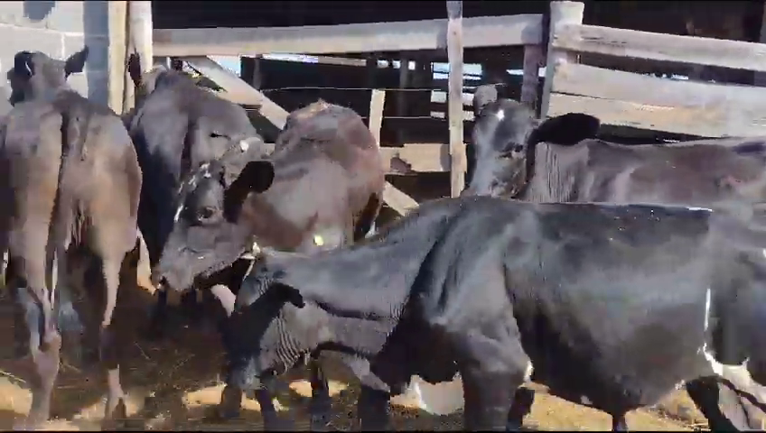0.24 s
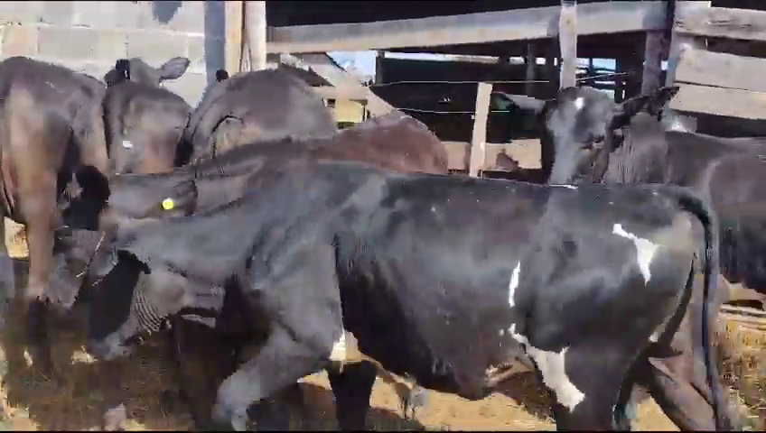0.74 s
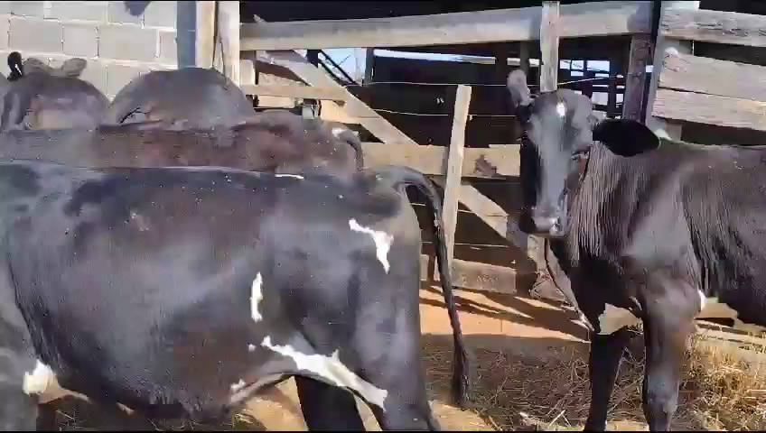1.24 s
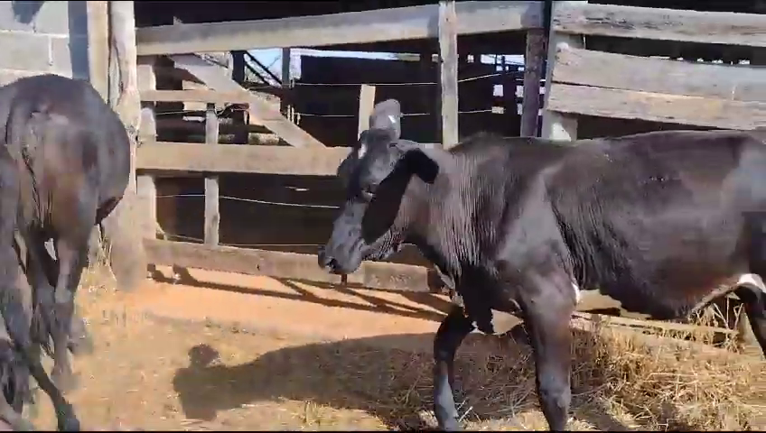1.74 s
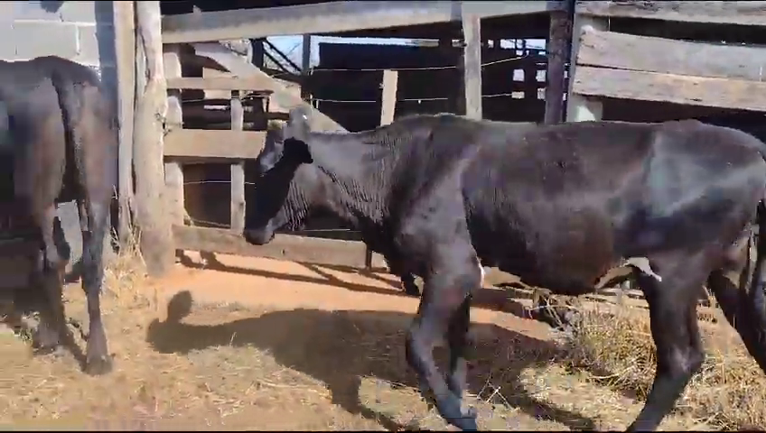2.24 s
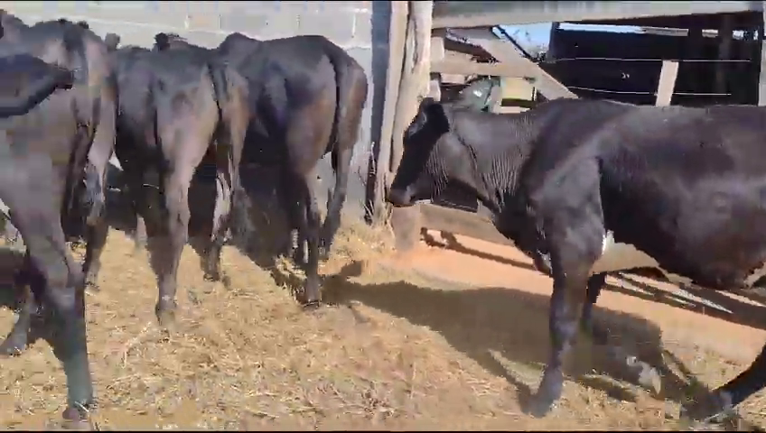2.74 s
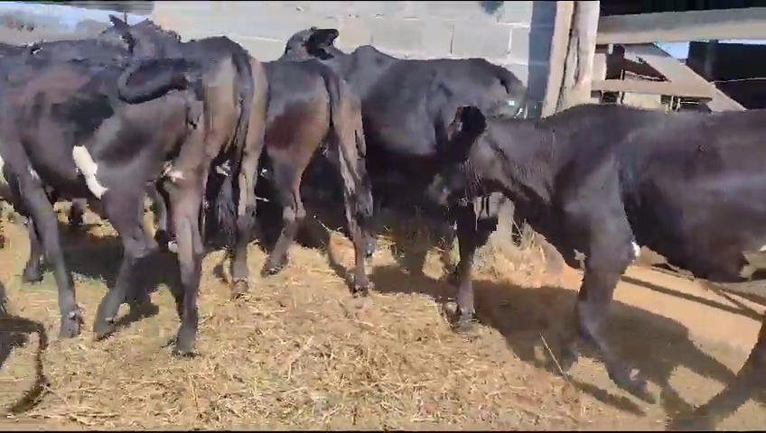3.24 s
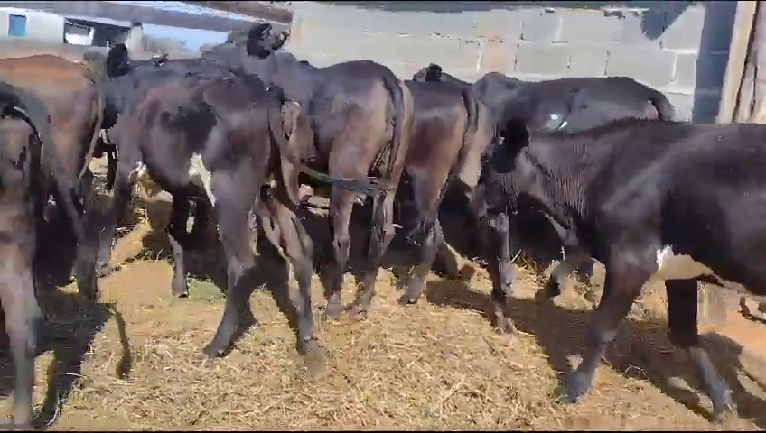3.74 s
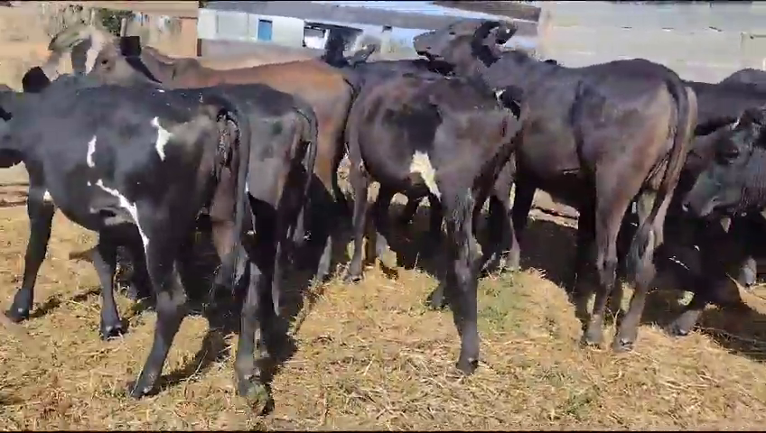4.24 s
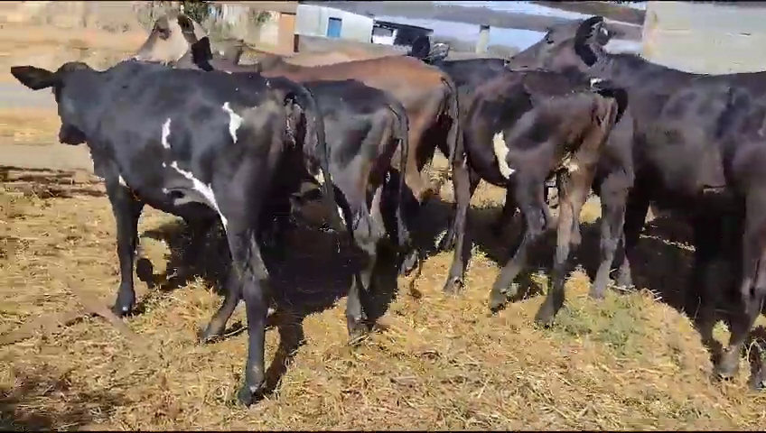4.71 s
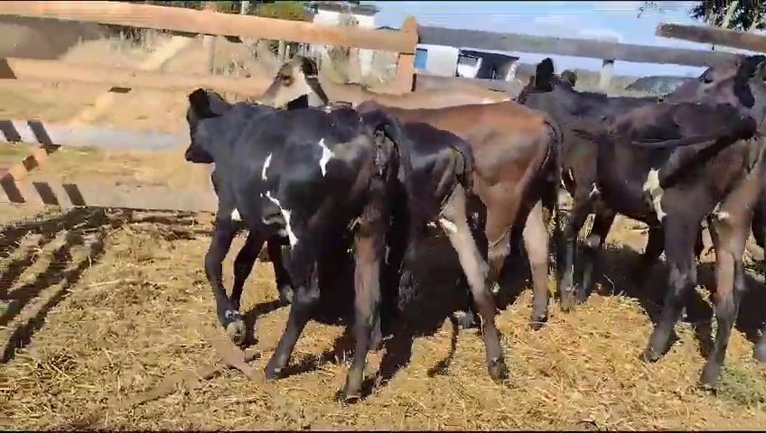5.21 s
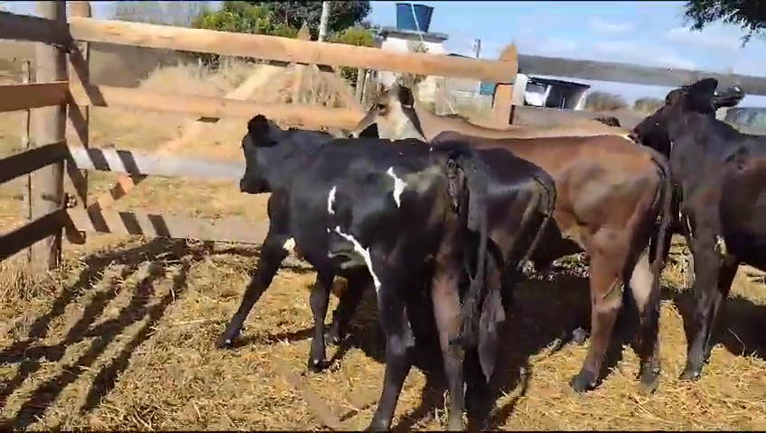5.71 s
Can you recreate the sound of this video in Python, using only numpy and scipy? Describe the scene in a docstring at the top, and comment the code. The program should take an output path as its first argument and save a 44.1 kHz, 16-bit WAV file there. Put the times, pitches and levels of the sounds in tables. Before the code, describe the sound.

Young cattle shuffle through dry straw in an open pen, with dull hoof clops, stalk snaps, gusty wind rumble and late plank knocks.

```python
"""Straw rustles and snaps first, under young cattle shuffling about in a straw-covered pen; hooves clop on packed earth.
Later one hoof scuffs hard and planks are knocked twice, with a short diffuse answer from wall and fences.
A light, gusty wind buffets the two microphone ports, over the quiet noise of the farmyard.
Straw is random fractures and hiss; hooves and planks are resonances; cracks, grit and wind are shaped noise and pulses."""
import sys
import numpy as np
from scipy import signal
from scipy.fft import rfft, irfft, next_fast_len
from scipy.io import wavfile
from scipy.ndimage import uniform_filter1d, map_coordinates

SR = 44100
rng = np.random.default_rng(int(sys.argv[2]) if len(sys.argv) > 2 else 0)


def bounce(signal):
    """Save signal as a 16-bit WAV file at the path given by the first command-line argument."""
    frames = np.transpose(np.atleast_2d(signal))
    limited = np.clip(frames, -1, 1)
    pcm = np.round(limited * 32767).astype(np.int16)
    wavfile.write(sys.argv[1], SR, pcm)


N = 263277  # length [samples]
TOP_HZ = 15900  # band limit of the recorder

# colour of the dry stalks: (frequency [Hz], relative level [dB])
STRAW_SPECTRUM = [(500, -24.5), (2000, -8), (2900, -12.5), (4500, -6.5), (6400, -3.5), (7500, -5),
                  (9100, -1.5), (10800, -1.5), (13000, -4), (15900, -2.5)]
# colour of the bedding pressed below them: (frequency [Hz], relative level [dB])
BEDDING_SPECTRUM = [(100, -52), (250, -2), (500, 7), (800, 2.5), (1200, 2), (1900, 2.5), (2800, -4),
                    (4500, 0.5), (9000, -26)]
# a thin sheen near 9 kHz on the straw: (time [s], level against the stalks [dB])
SHEEN_LEVEL = [(0, -7), (1.8, -11.5), (2.1, -3.5), (2.8, -8.5), (3.2, -27), (4.6, -10.5), (5.97, -10)]
# colour of that sheen: (frequency [Hz], relative level [dB])
SHEEN_SPECTRUM = [(6000, -32.5), (7800, -12), (8500, -9), (9300, -7.5), (10200, -15.5), (13000, -27)]


def straw():
    """Dry stalks rub and break under many legs; the bedding below crunches more dully."""
    rustle_db, crush_db = treading()
    sheen_db, = curves(SHEEN_LEVEL)
    lead_ms, = curves(BEARING)
    jostle = wobble(40)

    fractures = pair(crackle(rate=1500, spread_db=4.0, share=0.31), alike=0.011)
    stalks = coloured(patchy(fractures, depth_db=1.53), STRAW_SPECTRUM)
    sheen = amp(sheen_db) * coloured(rng.standard_normal((2, N)), SHEEN_SPECTRUM)
    facing = panned(3.4 + 3.7 * lead_ms)  # level balance follows the herd's bearing
    rustle = amp(rustle_db + 3.5 + 1.1 * jostle) * facing * (stalks + sheen)

    crunches = pair(crackle(rate=250, spread_db=7.5, share=0.54), alike=0.41)
    bedding = coloured(patchy(crunches, depth_db=2.0), BEDDING_SPECTRUM)
    crush = amp(crush_db + 2.0 + 1.66 * jostle + 0.8 * wobble(10)) * panned(1.3) * bedding
    return rustle + crush


# the whole herd's shuffling, fading as it moves off: (time [s], rustle level before straw() trims it [dB])
SHUFFLE_LEVEL = [(0, -52.5), (1.3, -52.5), (1.65, -55.5), (2.9, -55.5), (3.3, -51.5), (3.8, -56.5),
                 (4.7, -52.5), (5.6, -60.5), (5.97, -60)]
# a step drags through straw and presses the bedding:
# (start time [s], rustle level before trim [dB], crush level before trim [dB], time from start to release [s])
STEPS_IN_STRAW = [(0.0, -52.5, -62.5, 0.19), (0.549, -48, -69, 0.048), (0.674, -49, -62.5, 0.029),
                  (0.777, -69, -60.5, 0.14), (0.894, -53.5, -63.5, 0.17), (1.13, -55, -66.5, 0.29),
                  (1.39, -52.5, -65.5, 0.15), (1.66, -53.5, -88, 0.17), (1.982, -56.5, -85, 0.1),
                  (2.197, -56, -69, .04), (2.327, -57, -78, 0.2), (2.702, -54.5, -85, 0.033),
                  (2.82, -57, -80, 0.059), (2.943, -53.5, -70.5, 0.16), (3.415, -59.5, -67, 0.31),
                  (3.855, -54, -69, 0.16), (4.168, -54.5, -85, 0.053), (4.356, -58.5, -67, 0.19),
                  (4.763, -54, -89, 0.23), (5.08, -60, -84, .04), (5.25, -57, -65, 0.044),
                  (5.361, -56, -77, .13), (5.66, -58, -65, .04)]
SHUFFLE_CRUSH_DB = -68  # the bedding under the standing herd, before trim
STEP_ATTACK_S, STEP_RELEASE_S = 0.018, 0.053


def treading():
    """Rustle and crush in dB: each step rises, holds and dies away over the herd's shuffling, adding power."""
    t = np.arange(N) / SR
    shuffle_db, = curves(SHUFFLE_LEVEL)
    rustle, crush = amp(shuffle_db) ** 2, amp(SHUFFLE_CRUSH_DB) ** 2
    for s, rustle_db, crush_db, hold in STEPS_IN_STRAW:
        rise = np.clip((t - s) / STEP_ATTACK_S, 0, 1)
        stroke = rise * np.exp(-np.maximum(t - s - hold, 0) / STEP_RELEASE_S)
        rustle = rustle + (amp(rustle_db) * stroke) ** 2
        crush = crush + (amp(crush_db) * stroke) ** 2
    return 10 * np.log10(rustle), 10 * np.log10(crush)


# hooves on packed earth: (time [s], level before trim [dB], pitch [Hz], t60 of the gritty blow [s])
HOOF_FALLS = [(.093, -43, 960, 0.02), (0.348, -42, 1080, 0.017), (0.558, -45.5, 422, 0.044),
              (0.58, -45.5, 650, 0.04), (0.758, -38, 1280, 0.016), (.872, -46.5, 600, 0.016),
              (1.485, -49, 446, 0.028), (1.684, -53.5, 750, 0.044), (1.912, -52.5, 790, 0.017),
              (2.682, -50, 780, 0.017), (3.191, -44.5, 650, 0.015), (3.651, -47, 970, 0.04),
              (4.18, -50, 410, 0.023), (4.796, -40, 410, 0.012), (5.246, -58, 380, 0.057)]


def hooves():
    """A hoof gives a short hollow clop: a gritty blow through one broad resonance, applied twice."""
    track, t = np.zeros((2, N)), np.arange(SR // 6) / SR
    for s, db, pitch_hz, t60 in HOOF_FALLS:
        grit = pair(rng.standard_normal((3, len(t))), alike=0.98) * amp(-60 * t / t60)
        blow = amp(16) * (t == 0) + grit
        width = 1.05 * pitch_hz
        clop = filtered(blow, lambda f: (1j * f * width / (pitch_hz ** 2 - f * f + 1j * f * width)) ** 2)
        longer_is_stronger = np.sqrt(t60 / 0.024)
        add(track, s, amp(db - 20.0) * panned(2.6) * unit(clop) * longer_is_stronger)
    return track


# a hoof tip clicks on a pebble: (time [s], peak level before panning [dB], left-right balance [dB])
PEBBLE_CLICKS = [(0.5735, -19.5, 19), (.805, -32, 15), (2.564, -36, 17), (3.535, -29, 12)]
# colour of a pebble tick: (frequency [Hz], relative level [dB])
PEBBLE_SPECTRUM = [(300, -1), (900, -4), (1500, 0), (2400, 8.5), (4000, -5), (6200, -2), (7500, -13),
                   (15000, -15)]


def clicks():
    """Horn on stone: one hard, broad tick with a trace of grit."""
    track, t = np.zeros((2, N)), np.arange(SR // 20) / SR
    for s, db, balance_db in PEBBLE_CLICKS:
        grit = amp(-21.5) * rng.standard_normal(len(t)) * amp(-60 * t / 0.014)
        contact = np.pad((t == 0) + grit, (SR // 1000, 0))  # 1 ms of room for the filter
        tick = filtered(contact, lambda hz: amp(along(PEBBLE_SPECTRUM, hz)))
        add(track, s - .001, amp(db) * panned(balance_db) * tick / np.abs(tick).max())
    return track


# stalks that crack: (time [s], level of the crack [dB], brightness [dB per octave],
# splinter t60 [s], left-right balance [dB])
STALK_SNAPS = [(0.031, -22.5, 14, 0.023, 7), (0.403, -28.5, 19, 0.015, -1), (0.728, -27.5, 11, .005, 5),
               (0.8724, -25, 24, 0.015, 8), (1.247, -26, 19, 0.014, 10), (1.41, -35, 9, 0.056, -1),
               (1.811, -34, 23, 0.037, 7), (3.2428, -29, 10, 0.029, 3), (4.3813, -25, 3, 0.05, 17),
               (4.395, -29, 3.5, 0.026, -10), (4.449, -22, 2, 0.024, 14), (4.455, -26, 6, .015, -4),
               (4.78, -31.5, 19, .03, 3)]
# colour of a crack before its brightness tilt: (frequency [Hz], relative level [dB])
STALK_SPECTRUM = [(200, -29), (700, -14), (1450, 5.5), (2000, -3.5), (2800, -19), (3700, -6.5), (4800, -2),
                  (6200, -7), (7500, -11.5), (11000, -15), (15000, -28)]


def snaps():
    """A stalk breaks with one crack and a short run of splinters."""
    track, t = np.zeros((2, N)), np.arange(SR // 8) / SR
    hz = np.fft.rfftfreq(len(t), 1 / SR)
    for s, db, tilt_db, t60, balance_db in STALK_SNAPS:
        splinters = pair(rng.standard_normal((3, len(t))), alike=0.92)
        splinters = splinters * amp(3.6 * rng.standard_normal(len(t)))  # uneven sizes
        burst = (t == 0) + .15 * splinters * amp(-60 * t / t60)

        def colour(f):
            """Stalk spectrum, tilted about 4 kHz and band-limited."""
            return amp(along(STALK_SPECTRUM, f) + tilt_db * np.log2((f + 100) / 4000)) * (f < TOP_HZ)

        padded = np.pad(burst, ((0, 0), (SR // 1000, 0)))  # 1 ms of room for the filter
        crack = filtered(padded, colour) / colour(hz).mean()
        add(track, s - .001, amp(db) * panned(balance_db) * crack)
    return track


# a hoof scrapes and lands: (time [s], grit level before trim [dB], thump level before trim [dB],
# scrape length before scaling [s], brightness [dB per octave])
HOOF_SCUFFS = [(5.4, -56, -68, 0.019, 3), (5.4208, -44.5, -47, 0.029, 0.5), (5.463, -49, -38.5, 0.036, -3)]
# colour of the grit before its tilt: (frequency [Hz], relative level [dB])
GRIT_SPECTRUM = [(100, 6.5), (500, 4.5), (900, -2), (1400, 0), (2050, 3.5), (2600, -8), (3150, 9),
                 (3800, -6.5), (4800, 0.5), (7600, -3), (15000, -6)]


def scuffs():
    """Grit grinds under a sliding hoof while its weight thumps the ground at 190 Hz."""
    track, t = np.zeros((2, N)), np.arange(SR // 5) / SR
    grains = pair(crackle(rate=2000, spread_db=9.0, share=0.74), alike=0.41) * amp(1.6 * wobble(250))
    for s, grit_db, thump_db, length, tilt_db in HOOF_SCUFFS:
        ground = grains[:, round(s * SR):][:, :len(t)]
        grit = filtered(ground, lambda hz: amp(along(GRIT_SPECTRUM, hz) + tilt_db * np.log2(hz + 100)))
        stroke = (1 - np.exp(-t / 0.0023)) * np.exp(-(t / (0.97 * length)) ** 2)
        scrape = amp(grit_db + 8.5) * stroke * unit(grit)
        thump_shape = (1 - np.exp(-t / 0.0013)) * amp(-60 * t / 0.077)
        thump = amp(thump_db + 8.5) * np.sin(2 * np.pi * 190 * t) * thump_shape
        add(track, s, scrape * panned(-0.82) + thump)
    return track


# knocks on planks: (time [s], level before trim [dB], main mode [Hz], rattle against the ring [dB],
# ring t60 [s], loss of the other modes [dB per octave away from the main one])
PLANK_KNOCKS = [(4.509, -43, 593, -3.5, 0.081, 18), (5.609, -40, 457, -1, 0.26, 0.5)]
# modes of a plank: (frequency [multiple of the main mode], level before that loss [dB], share of the ring t60 [ratio])
PLANK_MODES = [(.55, 3, .4), (1, 0, 1), (1.04, -4, .9), (1.45, -3, .45), (2.38, -8, .35), (3.3, -16, .35)]
# colour of the chatter at the post: (frequency [Hz], relative level [dB])
CHATTER_SPECTRUM = [(100, -15), (300, -11), (700, 7), (1150, 11), (1400, -9), (2200, -7), (5000, -32)]


def planks():
    """A bumped plank rings briefly, its close modes beating, and chatters against its post."""
    track, t = np.zeros((2, N)), np.arange(SR // 2) / SR
    for s, db, pitch_hz, rattle_db, t60, focus_db in PLANK_KNOCKS:
        ring = np.zeros(len(t))
        for k, level, share in PLANK_MODES:
            mode_db = level - focus_db * abs(np.log2(k)) - 60 * t / (share * t60)
            ring += amp(mode_db) * np.sin(2 * np.pi * k * pitch_hz * t)
        rattle = coloured(pair(rng.standard_normal((3, len(t))), alike=0.81), CHATTER_SPECTRUM)
        chatter = amp(rattle_db - 60 * t / 0.065) * rattle
        onset = 1 - np.exp(-t / 0.0017)
        add(track, s, amp(db - 1) * panned(0.8) * (ring + chatter) * onset)
    return track


# bearing of the herd, swinging from left to right: (time [s], lead of the left port [ms])
BEARING = [(0, .27), (2.2, .27), (3.4, 0), (4.3, -.4), (5.4, -.47), (5.97, -.47)]


def at_ports(x):
    """Sound from one side reaches the nearer microphone port a little earlier."""
    lead_ms, = curves(BEARING)
    half = lead_ms / 1000 * SR / 2  # each port takes half the lead [samples]
    left = map_coordinates(x[0], [np.arange(N) + half], order=5)
    right = map_coordinates(x[1], [np.arange(N) - half], order=5)
    return np.array([left, right])


# how long the pen answers: (frequency [Hz], t60 [s])
PEN_DECAY = [(150, 0.22), (1000, 0.083), (10000, 0.14)]


def pen(x):
    """The wall and fences give a short diffuse answer: decaying noise that starts 5.2 ms late."""
    hz, t, z = signal.stft(rng.standard_normal((2, SR // 3)), SR, nperseg=256)
    decay = amp(-60 * t / along(PEN_DECAY, hz)[:, None])
    tail = signal.istft(z * decay, SR, nperseg=256)[1]
    tail = np.pad(tail / np.linalg.norm(tail[0]), ((0, 0), (round(0.0052 * SR), 0)))
    return signal.fftconvolve(x, tail, axes=1)[:, :N]


# a large eddy hits a port with one push inside a ragged wake:
# (time [s], push level [dB], wake level [dB], wake width before scaling [s], left-right balance [dB])
LARGE_EDDIES = [(0.187, -36.5, -45, 0.038, 12), (.298, -41, -49, 0.031, 9), (0.797, -33.5, -36, .012, 23),
                (1.108, -33.5, -43.5, 0.023, -27), (1.359, -39, -52, 0.0087, 22),
                (2.304, -34, -45, 0.079, 24), (2.497, -23, -33.5, 0.042, 36), (2.661, -38.5, -51, .005, 21),
                (2.971, -26, -37, .014, 14), (3.016, -30, -35.5, 0.018, 21), (3.088, -29.5, -39, 0.017, 24),
                (3.106, -28.5, -38, 0.019, 20), (3.145, -35.5, -39, .012, 15),
                (3.237, -29.5, -33.5, 0.0094, 25), (3.342, -24.5, -42, 0.022, 32),
                (3.503, -26.5, -45, 0.0091, 35), (3.544, -21, -33, 0.0096, 38),
                (5.687, -35, -40, 0.033, 23), (5.845, -22.5, -28, 0.025, 32),
                (5.889, -24.5, -30.5, .017, 37)]
# colour of the rumble at the ports: (frequency [Hz], relative level [dB])
BUFFET_SPECTRUM = [(10, 1.5), (25, 2), (60, -3.5), (100, -8), (160, -21), (300, -66), (700, -89),
                   (2000, -120)]
# colour of wakes and small eddies: (frequency [Hz], relative level [dB])
EDDY_SPECTRUM = [(20, 4.5), (80, 4.5), (160, -0.5), (250, -9.5), (400, -23), (700, -39), (2000, -67)]
# small eddies arrive at random; their level rises FLUTTER_GROWS dB for each dB of wind
FLUTTER_DB, FLUTTER_GROWS, FLUTTER_BURST_DB = -2, 1.39, 3.5
PUSH_S = .0026  # time scale of an eddy's core crossing the port


def wind():
    """Each port has its own rumble and flutter; small fast eddies reach higher, large ones push and leave a wake."""
    wind_db = gusts()
    rumble_db = wind_db + 1.33 * np.array([wobble(28), wobble(25)]) - 2.0
    rumble = amp(rumble_db) * coloured(rng.standard_normal((2, N)), BUFFET_SPECTRUM)

    bursts_db = FLUTTER_BURST_DB * np.array([wobble(45), wobble(45)])
    small_eddies = coloured(crackle(rate=60, spread_db=1.5, share=.6)[:2], EDDY_SPECTRUM)
    flutter = amp(FLUTTER_DB + FLUTTER_GROWS * wind_db + bursts_db) * small_eddies

    eddies, t = np.zeros((2, N)), np.arange(SR // 5) / SR - .1
    u = (t / PUSH_S) ** 2
    push = (1 - 2 * u) / (1 + u) ** 2.5 * np.exp(-u / 20)  # one peak between two shallow dips
    for s, push_db, wake_db, wake_s, balance_db in LARGE_EDDIES:
        swell = np.exp(-(t / (0.56 * wake_s)) ** 2)
        ragged = swell * rng.standard_normal((2, len(t)))
        wake = filtered(ragged, lambda hz: amp(along(EDDY_SPECTRUM, hz)))
        wake = wake * np.linalg.norm(swell) / np.linalg.norm(wake, axis=1, keepdims=True)
        add(eddies, s + t[0], panned(balance_db) * (amp(push_db) * push + amp(wake_db) * wake))
    return rumble + flutter + eddies


# gusts swell and die on a bell curve:
# (centre time [s], level before wind() trims it [dB], half-width at 1/e of the power [s], left-right balance [dB])
GUST_SWELLS = [(.18, -43, 0.15, 25), (.82, -39.5, 0.052, 3.5), (1.11, -39, 0.15, -24), (1.37, -42, 0.13, 9),
               (1.67, -40.5, 0.076, 3.5), (2.3, -39, 0.12, 24), (2.56, -37.5, 0.079, 14),
               (2.73, -48, .04, -18), (3.0, -28.5, 0.031, 5), (3.14, -31, 0.064, 1), (3.27, -34, 0.073, 14),
               (3.54, -36.5, 0.081, 28), (3.67, -44, 0.029, -19), (3.85, -43.5, 0.21, 10),
               (4.72, -41.5, 0.075, 19), (4.92, -39.5, 0.054, 2), (5.13, -36.5, .1, 10.5),
               (5.38, -37.5, 0.064, 2), (5.84, -29, 0.14, 10)]
# the steady breeze at the ports: level before trim, left-right balance, and how far and how often it wanders
BREEZE_DB, BREEZE_BALANCE_DB, BREEZE_WANDER_DB = -49, 5.5, 4.5
BREEZE_TURNS_PER_S = 9


def gusts():
    """Wind strength in dB at each port: the gusts add their power to the breeze."""
    t = np.arange(N) / SR
    wander = np.array([wobble(BREEZE_TURNS_PER_S), wobble(BREEZE_TURNS_PER_S)])
    power = (amp(BREEZE_DB + BREEZE_WANDER_DB * wander) * panned(BREEZE_BALANCE_DB)) ** 2
    for s, db, width, balance_db in GUST_SWELLS:
        power = power + (amp(db) * panned(balance_db)) ** 2 * np.exp(-((t - s) / width) ** 2)
    return 10 * np.log10(power)


# colour of the farmyard behind the pen: (frequency [Hz], relative level [dB])
YARD_SPECTRUM = [(30, 4), (120, -2.5), (250, -0.5), (500, -8.5), (1000, -14.5), (3000, -19), (15000, -15)]


def yard():
    """The quiet farmyard is steady coloured noise, mostly alike at both ports."""
    return amp(-61.5) * coloured(pair(rng.standard_normal((3, N)), alike=0.82), YARD_SPECTRUM)


def crackle(rate, spread_db, share):
    """Three streams of tiny fractures of uneven size over the hiss of countless smaller ones."""
    hits = rng.random((3, N)) < rate / SR  # rate in fractures a second
    sizes = amp(spread_db * np.minimum(rng.standard_normal((3, N)), 2)) * rng.choice([-1, 1], (3, N))
    share = np.clip(share, 0, 1)
    return np.sqrt(share) * unit(hits * sizes) + np.sqrt(1 - share) * rng.standard_normal((3, N))


def patchy(x, depth_db):
    """Now this patch of stalks sounds, now that one, each in its own range of pitch."""
    z = signal.stft(x, nperseg=256)[2]
    field = rng.standard_normal(z.shape[1:])
    field = uniform_filter1d(field, size=12, axis=0)  # smooth over frequency
    field = uniform_filter1d(field, size=24, axis=1)  # smooth over time
    return unit(signal.istft(z * amp(depth_db * unit(field)), nperseg=256)[1][:, :N])


def pair(three, alike):
    """Two channels that share a part of their signal."""
    alike = np.clip(alike, 0, 1)
    return np.sqrt(alike) * three[0] + np.sqrt(1 - alike) * three[1:]


def panned(balance_db):
    """Left and right gains of constant power; positive is left."""
    gains = amp(np.array([balance_db, -balance_db]) / 2).reshape(2, -1)
    return gains / np.sqrt(np.mean(gains ** 2, axis=0))


def amp(db):
    """Decibels to gain."""
    return 10 ** (np.asarray(db) / 20)


def unit(x):
    """Scale to rms 1."""
    return x / np.sqrt(np.mean(x ** 2) + 1e-20)


def along(points, hz):
    """Read (Hz, value) points on a log frequency axis."""
    f, v = np.transpose(points)
    return np.interp(np.log(hz + 1), np.log(f + 1), v)


def curves(rows):
    """One value per sample for each column after the time."""
    s, *cols = np.transpose(rows)
    return [np.interp(np.arange(N) / SR, s, c) for c in cols]


def wobble(rate):
    """A smooth random curve, rate knots a second."""
    knots = rng.standard_normal(int(N * rate / SR) + 4)
    return map_coordinates(knots, [np.arange(N) * rate / SR])


def filtered(x, response):
    """x times a response of frequency."""
    n = x.shape[-1]
    m = next_fast_len(n + 8192)
    return irfft(rfft(x, m) * response(np.fft.rfftfreq(m, 1 / SR)), m)[..., :n]


def coloured(x, spectrum):
    """x shaped by a spectrum, at rms 1."""
    return unit(filtered(x, lambda hz: amp(along(spectrum, hz))))


def add(track, s, sound):
    """Mix a sound into a track from time s."""
    start = max(round(s * SR), 0)
    track[:, start:start + sound.shape[-1]] += sound[..., :N - start]


def scene():
    """The herd's straw and contacts in the pen, then the pen's answer, the wind and the quiet farmyard."""
    contacts = hooves() + clicks() + snaps() + scuffs() + planks()
    herd = at_ports(straw() + contacts)
    return herd + amp(-10.5) * pen(contacts) + wind() + yard()


def record(dry):
    """The recorder keeps nothing above its band limit."""
    return filtered(dry, lambda hz: hz < TOP_HZ)


dry = scene()
out = record(dry)
bounce(out)
```